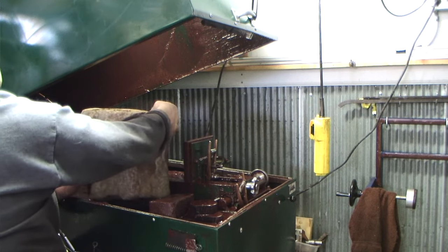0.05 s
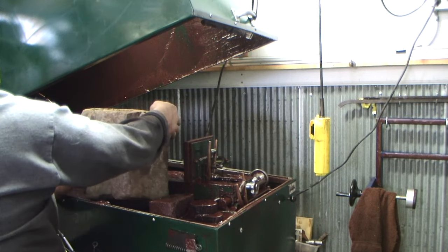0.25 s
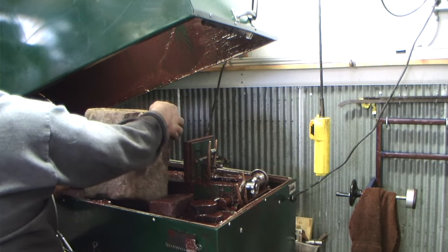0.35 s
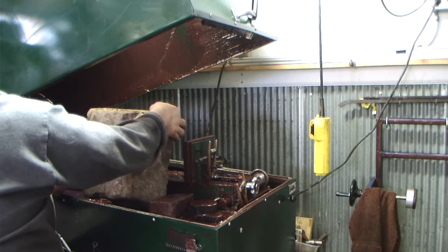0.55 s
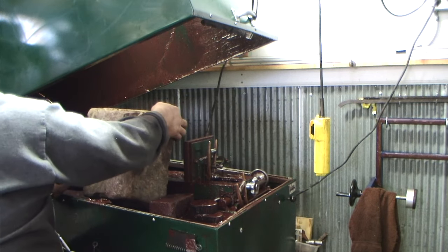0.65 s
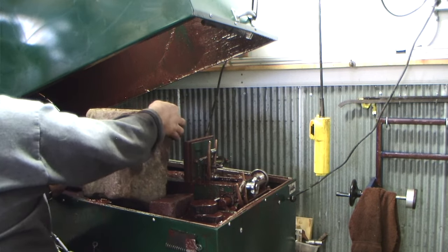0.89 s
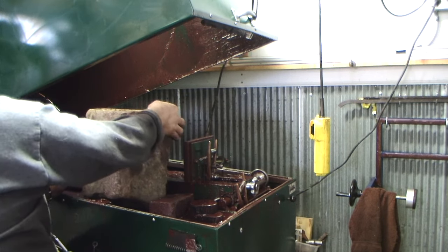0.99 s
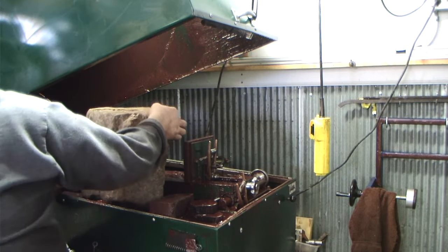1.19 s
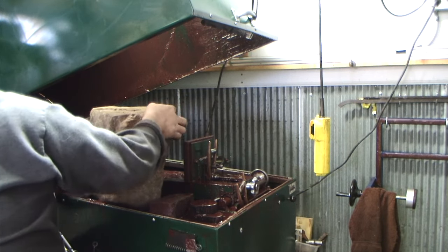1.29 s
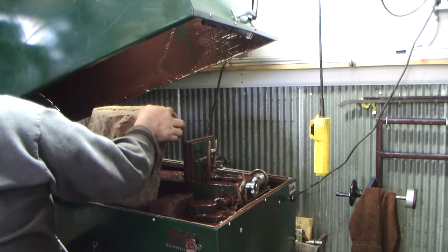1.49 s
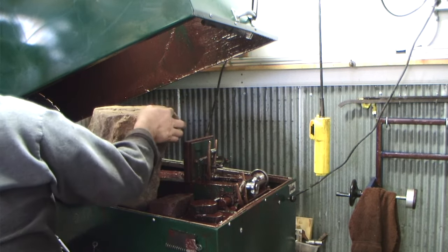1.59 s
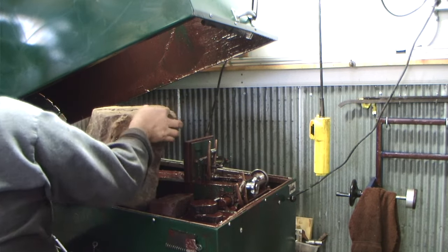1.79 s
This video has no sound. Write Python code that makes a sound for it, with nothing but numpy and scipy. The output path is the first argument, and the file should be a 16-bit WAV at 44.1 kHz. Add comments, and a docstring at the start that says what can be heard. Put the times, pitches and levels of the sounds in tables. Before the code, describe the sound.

A heavy rough stone grinds across a steel saw bed in short, juddering jerks, ending in a knock and faint metal ringing. A second, quieter shove rasps and crunches grit. The nearby scraping echoes briefly in a workshop.

```python
"""Workshop: a heavy rough stone is shoved twice across the steel bed of a slab saw.
It grinds in short stick-slip strokes, judders, snags, rasps, crushes grit and thuds on the frame.
A knocked steel part of the saw rings faintly.
The open hood and the sheet-metal room reflect the sound, over faint air noise."""
import sys
import numpy as np
from scipy import signal
from scipy.fft import irfft
from scipy.io import wavfile
from scipy.ndimage import uniform_filter1d

SR = 44100
rng = np.random.default_rng(int(sys.argv[2]) if len(sys.argv) > 2 else 0)


def store_pcm(level_fs):
    """Save levels as 16-bit WAV."""
    pcm = np.round(np.clip(level_fs, -1, 1) * 32767).astype(np.int16)
    wavfile.write(sys.argv[1], SR, np.atleast_2d(pcm).T)


N = 81585
BINS_HZ = np.fft.rfftfreq(8192, 1 / SR)

# Stone strokes (start [s], length [s], grind [dB], judder [dB], grit [dB])
STROKES = [(-.03, 0.045, -28.5, -59, -38.5), (0.019, 0.038, -34.5, -73, -46),
           (0.096, 0.06, -34.5, -43, -42), (0.168, 0.022, -30, -60, -33.5),
           (0.189, 0.061, -23.5, -46, -26.5), (0.26, 0.032, -14, -44, -56), (0.287, 0.018, -15.5, -19, -37),
           (0.311, 0.022, -19, -53, -31), (0.341, 0.058, -15.5, -31, -31.5),
           (0.406, 0.046, -24, -31.5, -35), (0.516, 0.037, -22, -27, -37.5), (0.636, 0.024, -34, -44, -69),
           (0.902, 0.05, -44, -55, -53), (1.118, 0.26, -51, -61, -52.5), (1.233, 0.036, -29.5, -52, -32),
           (1.289, 0.028, -27, -47, -39.5), (1.336, 0.039, -36, -48, -45), (1.384, 0.048, -30, -43.5, -33),
           (1.414, 0.069, -35.5, -39.5, -43), (1.474, 0.077, -39, -41.5, -52),
           (1.542, 0.051, -40, -36.5, -53), (1.629, 0.056, -42.5, -43.5, -50.5),
           (1.738, 0.05, -57, -60, -55), (1.829, 0.045, -51, -52, -57)]
# Contact spectra (frequency [Hz], relative level [dB])
GRIND_SPECTRUM = [(50, -38.5), (250, -13.5), (480, -13), (720, 0), (1050, -2), (1450, -1.5), (2000, 0.5),
                  (2700, -2.5), (3600, -6), (4800, -11), (6500, -18), (9000, -36), (15000, -51)]
JUDDER_SPECTRUM = [(25, -44), (60, -21), (190, -13.5), (285, 0), (460, 3), (700, -8), (1100, -1),
                   (5000, -44.5)]
GRIT_SPECTRUM = [(80, -54), (1500, -18), (3500, 2.5), (5500, 3), (7500, -3), (9000, -5), (11500, -5),
                 (13500, -12.5), (15500, -21)]
# Damped resonances of the loaded bed (centre [Hz], width [Hz], boost [dB])
BED_RESONANCES = [(645, 35, 5), (710, 25, 3), (795, 35, 3), (1920, 50, 5), (2310, 40, 4), (2620, 40, 4),
                  (4230, 40, 5), (4625, 35, 6)]
# Snags: catch, release, drop (time [s], scrape [dB], clunk [dB])
SNAGS = [(.2905, 0, 8), (.2972, 6, 4), (.2992, 6, 1), (.3072, 0, 9), (.3605, 0, -10), (.371, 0, -8),
         (.383, 5, 3), (.3925, 5, -2)]
# Cracking grains (time [s], level [dB])
CRACKS = [(.103, -15), (.656, -20.5), (1.107, -28), (1.246, -10.5), (1.55, -18), (1.758, -25)]
# Edge bites (start [s], length [s], level [dB], centre [Hz], half-width [Hz])
RASPS = [(0.531, 0.02, -20, 1390, 167), (1.29, 0.15, -33, 1185, 190), (1.387, 0.1, -31.5, 1340, 233),
         (1.411, 0.099, -38, 1224, 105)]
# Stone's weight on the frame (time [s], level [dB])
THUDS = [(.405, -48), (.543, -36), (1.447, -36), (1.56, -46), (1.715, -50)]
# Knocks on the steel part (time [s], level [dB])
KNOCKS = [(.536, -20), (.915, -47)]
# Modes of frame and steel part (frequency [Hz], level [dB], T60 [s])
FRAME_MODES = [(47, -5, 0.05), (113.8, -6, 0.19), (278, 5, 0.093)]
STEEL_MODES = [(1292, -5, .27), (1590, -1, .6), (2816, -3, .3), (3263, -7, .44), (3889, 0, .37),
               (3985, -10, .42)]
# Room decay (frequency [Hz], T60 [s])
ROOM_DECAY = [(100, 1), (350, 0.68), (2500, 0.58), (5000, 0.67), (9000, 0.76), (15000, 0.67)]
# Workshop air (frequency [Hz], relative level [dB])
AIR_SPECTRUM = [(20, -28), (100, -8), (200, 3), (330, 3.5), (800, -1.5), (2000, -1.5), (15000, -37)]
# Stereo width of the reflections (frequency [Hz], side gain [dB])
SIDE_GAIN = [(300, -13.5), (1100, -8.5), (4500, -6.5), (9000, 0.5)]
# Stereo balance (frequency [Hz], left minus right [dB])
BALANCE = [(60, 2.5), (450, 3), (1000, 2.5), (8000, -0.5)]


def grinding(clunk_hz=508, clunk_half_width_hz=300):
    """Rough stone shakes the bed; heavier slips judder; snags scrape and clunk."""
    bed_db = sum(db / (1 + (2 * (BINS_HZ - hz) / width_hz) ** 2) for hz, width_hz, db in BED_RESONANCES)
    strokes, snags = np.array(STROKES), np.array(SNAGS)
    grind = friction(strokes[:, [0, 1, 2]]) + clicks(snags[:, [0, 1]])
    grind = colour(grind, curve(GRIND_SPECTRUM) + bed_db)
    judder = friction(strokes[:, [0, 1, 3]], rate_per_s=700, spread_db=2.6)
    judder = colour(judder, curve(JUDDER_SPECTRUM) + bed_db)
    clunk_db = resonance_db(clunk_hz, clunk_half_width_hz) + low_cut_db(clunk_hz) + bed_db
    return grind + judder + colour(clicks(snags[:, [0, 2]]), clunk_db)


def friction(strokes, rate_per_s=2600, spread_db=3.2, chatter_hz=109.55, attack_s=.008, release_s=.008):
    """Tiny uneven collisions, bunched by stick-slip chatter, under the stroke envelopes."""
    index = np.arange(N)
    t = index / SR
    sizes = amp(spread_db * np.minimum(rng.exponential(1, N), 4)) * rng.choice([-1, 1], N)
    chatter_db = np.interp(2 * chatter_hz * t, index, rng.standard_normal(N))
    grains = sizes * (rng.random(N) < rate_per_s / SR) * amp(chatter_db)
    grains /= np.sqrt(abs(uniform_filter1d(grains ** 2, size=1100)) + 1e-4)  # level over 25 ms
    power = np.zeros(N)
    for start_s, length_s, db in strokes:
        attack = np.clip((t - start_s) / attack_s, 0, 1)
        release = np.exp(-np.maximum(t - start_s - length_s, 0) / release_s)
        power += (amp(db) * attack * release) ** 2
    return grains * np.sqrt(power)


def grit(crumble_s=.004, crack_cut_hz=7000):
    """Crushed sand fizzes; single grains crack with a thin tick and crumble."""
    fizz = friction(np.array(STROKES)[:, [0, 1, 4]], rate_per_s=5600)
    t = np.arange(SR) / SR
    crumble = sparse_noise(density=.1) * np.exp(-t / crumble_s)
    cracks = convolve(clicks(CRACKS), unit_energy(crumble))
    grit_db = curve(GRIT_SPECTRUM)
    return colour(fizz, grit_db) + colour(cracks, grit_db + low_cut_db(crack_cut_hz))


def rasps():
    """Each biting edge drives one resonance; a narrow one groans."""
    return sum(colour(friction([(start_s, length_s, db)]), resonance_db(hz, half_width_hz))
               for start_s, length_s, db, hz, half_width_hz in RASPS)


def frame_thuds():
    """The stone's weight excites the low frame modes."""
    return convolve(clicks(THUDS), ring(FRAME_MODES))


def steel_ring(rise_s=.014):
    """The knocked part swells briefly and rings on."""
    t = np.arange(SR) / SR
    return convolve(clicks(KNOCKS), ring(STEEL_MODES) * np.minimum(t / rise_s, 1))


def reflections(hood_db=-1, hood_t60_s=.13, room_db=-3, room_rise_s=.024):
    """Impulse response: quick hood echoes, then the room tail."""
    t = np.arange(SR) / SR
    hood = sparse_noise(density=.05) * amp(-60 * t / hood_t60_s) * (t > .001)
    hz, frame_s, spectra = signal.stft(rng.standard_normal(SR), SR, nperseg=256)
    spectra *= amp(-60 * frame_s / curve(ROOM_DECAY, hz)[:, None])
    tail = signal.istft(spectra, SR, nperseg=256)[1][:SR] * np.minimum(t / room_rise_s, 1)
    return amp(hood_db) * unit_energy(hood) + amp(room_db) * unit_energy(tail)


def shifting_echoes(x, paths=5, step_s=.05):
    """Echo paths change as the stone moves: a cyclic crossfade of random responses."""
    position = np.arange(N) / SR / step_s
    echoes = np.zeros(N)
    for path in range(paths):
        distance = abs((position - path + paths / 2) % paths - paths / 2)
        fade = np.cos(np.pi / 2 * np.minimum(distance, 1))
        echoes += convolve(x * fade, reflections())
    return echoes


def workshop_air():
    """Steady, dull noise of the room."""
    return colour(rng.standard_normal(N), curve(AIR_SPECTRUM))


def amp(db):
    """Decibels to gain."""
    return 10 ** (np.asarray(db) / 20)


def unit_energy(x):
    """Scale to energy 1."""
    return x / np.linalg.norm(x)


def curve(points, hz=BINS_HZ):
    """Interpolate a table over log frequency."""
    points_hz, values = np.transpose(points)
    return np.interp(np.log(hz + 1), np.log(points_hz), values)


def resonance_db(hz, half_width_hz):
    """One broad peak, bass rolled off."""
    bass_gain = np.minimum((BINS_HZ + 1) / hz, 1)
    return 20 * np.log10(bass_gain / (1 + ((BINS_HZ - hz) / half_width_hz) ** 2))


def low_cut_db(hz):
    """12 dB/octave roll-off below hz."""
    return 40 * np.log10(np.minimum((BINS_HZ + 1) / hz, 1))


def min_phase(db):
    """Minimum-phase impulse response from gain per bin."""
    log_gain = np.log(amp(np.concatenate([db, db[-2:0:-1]])))
    spectrum = np.exp(np.conj(signal.hilbert(log_gain)))
    return irfft(spectrum[:len(db)])[:len(db) - 1]


def convolve(x, response):
    """Convolve, keeping the length."""
    return signal.fftconvolve(x, response)[:len(x)]


def colour(x, db):
    """Shape the spectrum with a unit-energy filter."""
    return convolve(x, unit_energy(min_phase(db)))


def clicks(events):
    """One impulse per (time [s], level [dB]) row."""
    impulses = np.zeros(N)
    for time_s, db in events:
        impulses[round(time_s * SR)] += amp(db)
    return impulses


def sparse_noise(density):
    """One second of random impulses."""
    return rng.standard_normal(SR) * (rng.random(SR) < density)


def ring(modes):
    """Decaying sines of a struck object."""
    t = np.arange(SR) / SR
    return sum(amp(db - 60 * t / t60_s) * np.sin(2 * np.pi * hz * t) for hz, db, t60_s in modes)


def scene(air_db=-52, master_db=-3):
    """Mid/side mix, slightly left."""
    air = amp(air_db) * workshop_air()
    direct = grinding() + grit() + rasps() + frame_thuds() + air
    steel = steel_ring()
    mid = direct + steel + shifting_echoes(direct)
    side = convolve(shifting_echoes(direct + steel), min_phase(curve(SIDE_GAIN)))
    half_balance_db = curve(BALANCE) / 2
    left = convolve(mid + side, min_phase(half_balance_db))
    right = convolve(mid - side, min_phase(-half_balance_db))
    return amp(master_db) * np.array([left, right])


def record(dry, highpass_hz=55, lowpass_hz=15700):
    """Microphone bass roll-off, soft clip near full scale, band limit."""
    highpass = signal.butter(2, highpass_hz, "highpass", fs=SR, output="sos")
    thinned = signal.sosfilt(highpass, dry)
    clipped = thinned / (1 + thinned ** 8) ** (1 / 8)
    lowpass = signal.firwin(511, lowpass_hz, window=("kaiser", 9), fs=SR)
    return signal.oaconvolve(clipped, lowpass[None], "same")


dry = scene()
out = record(dry)
store_pcm(out)
```